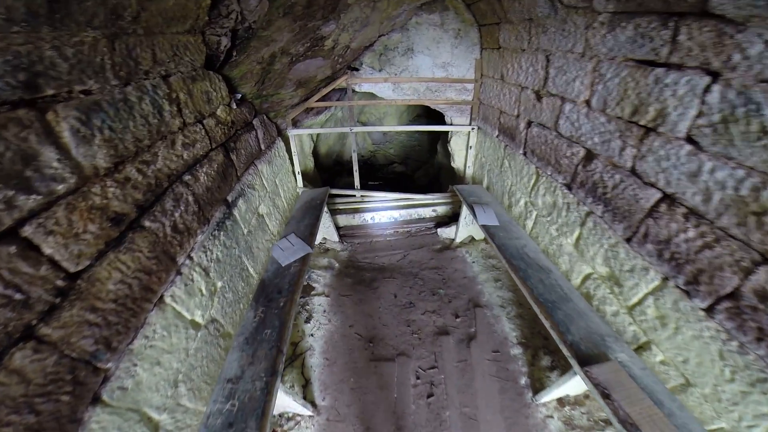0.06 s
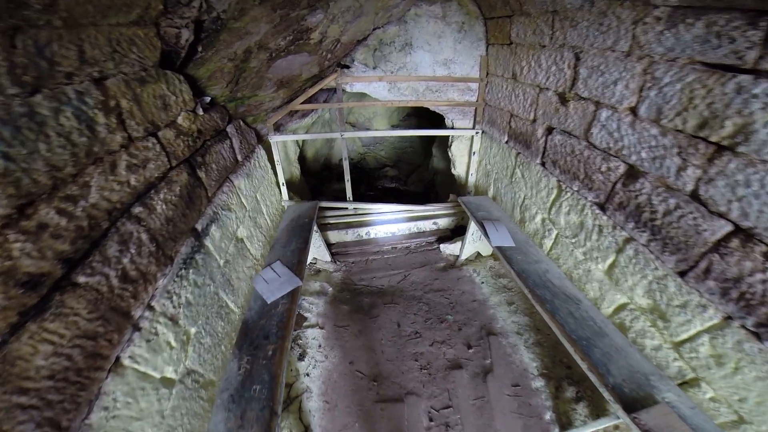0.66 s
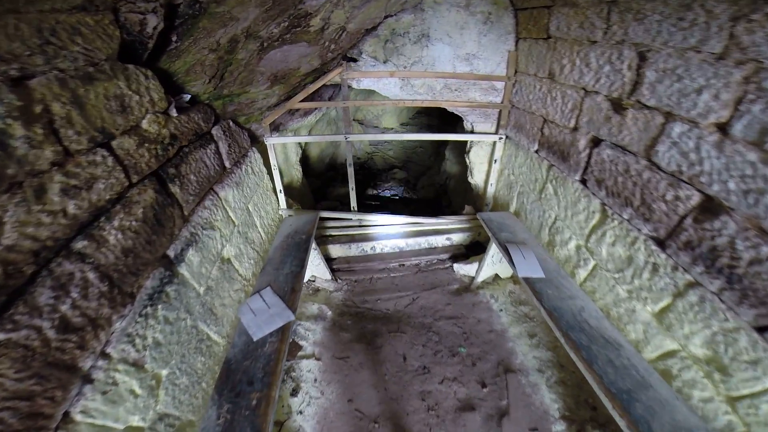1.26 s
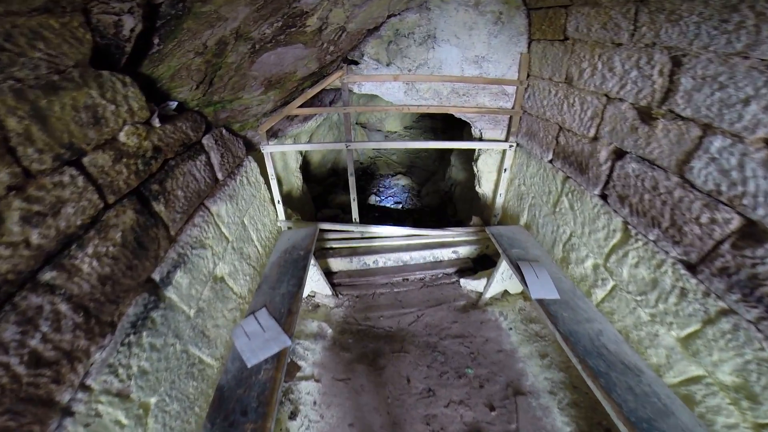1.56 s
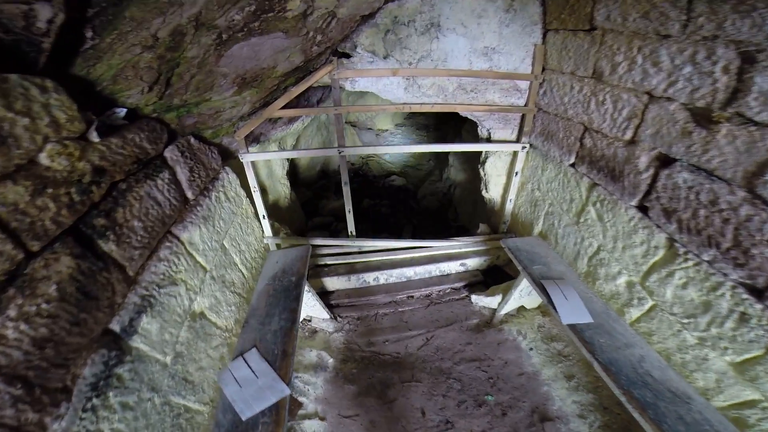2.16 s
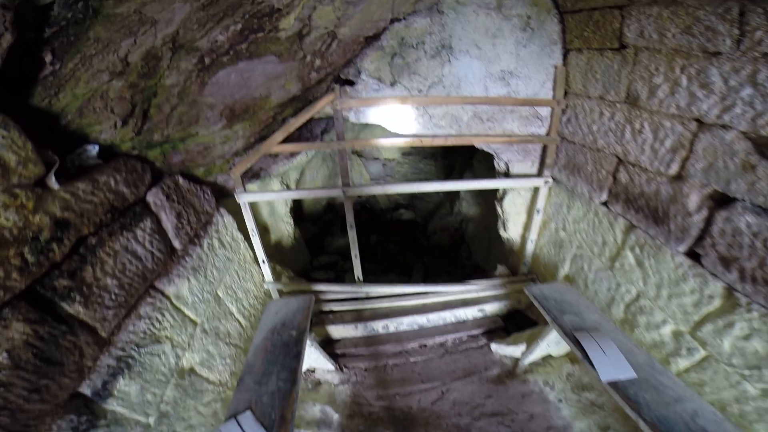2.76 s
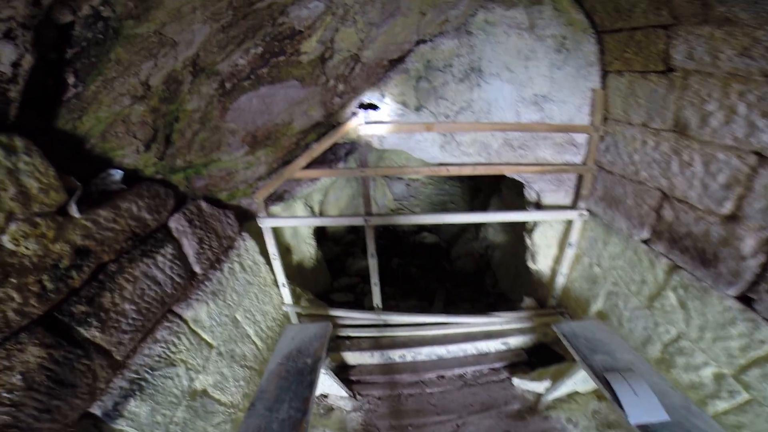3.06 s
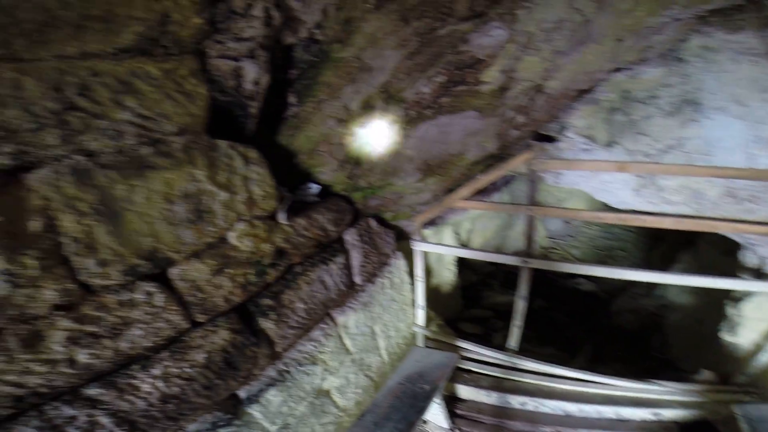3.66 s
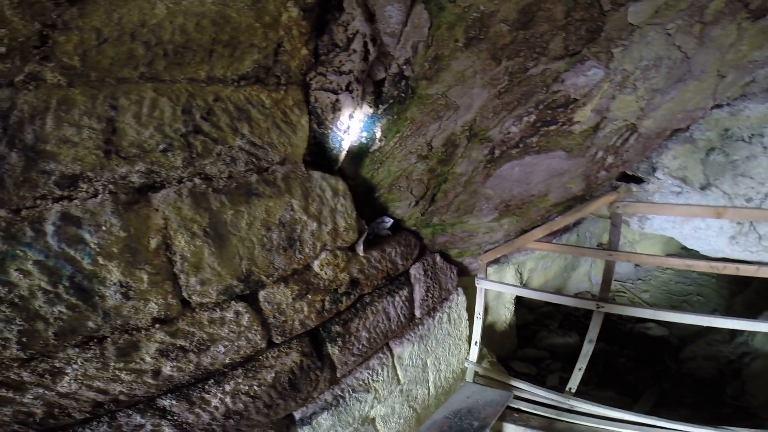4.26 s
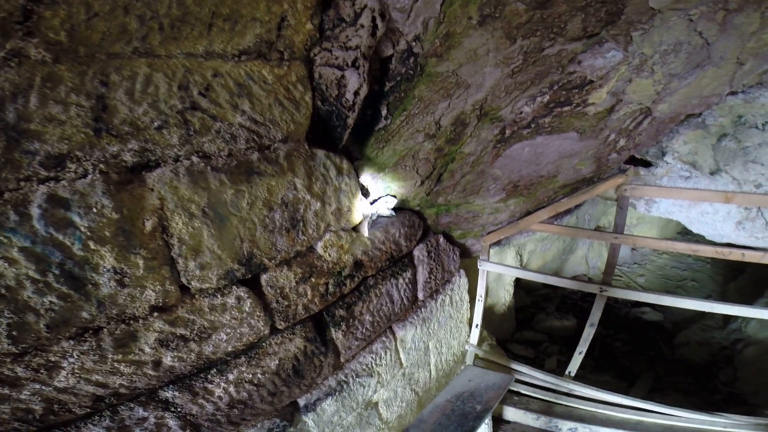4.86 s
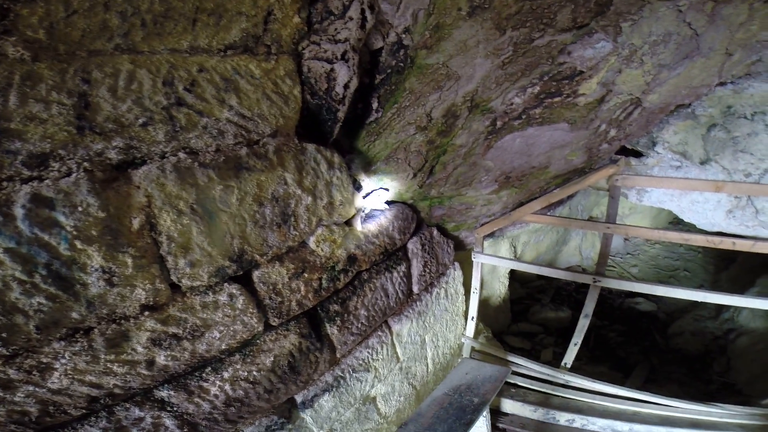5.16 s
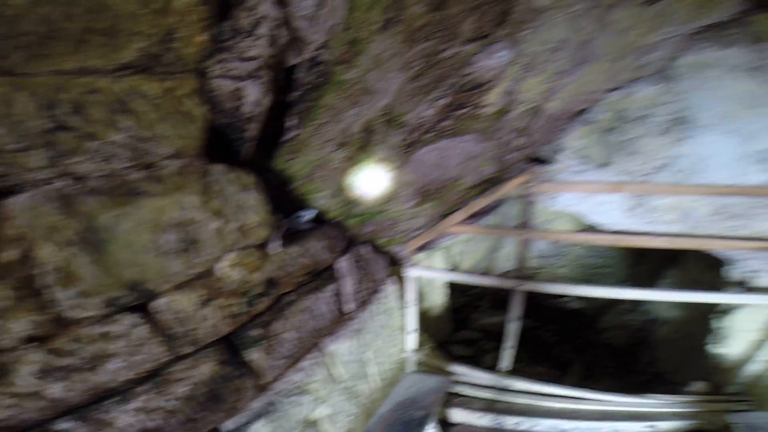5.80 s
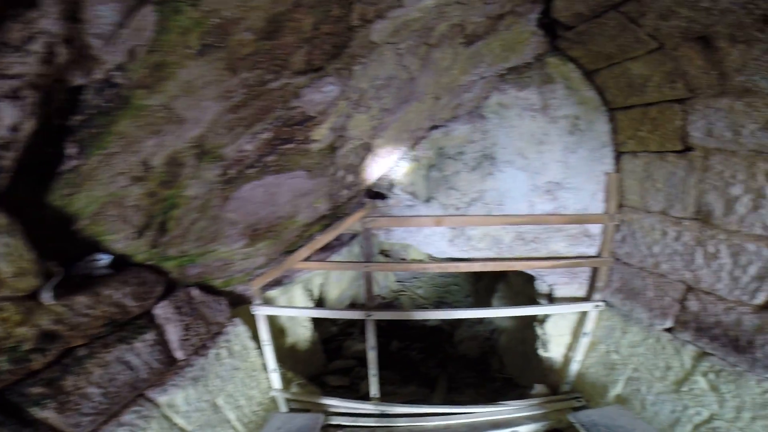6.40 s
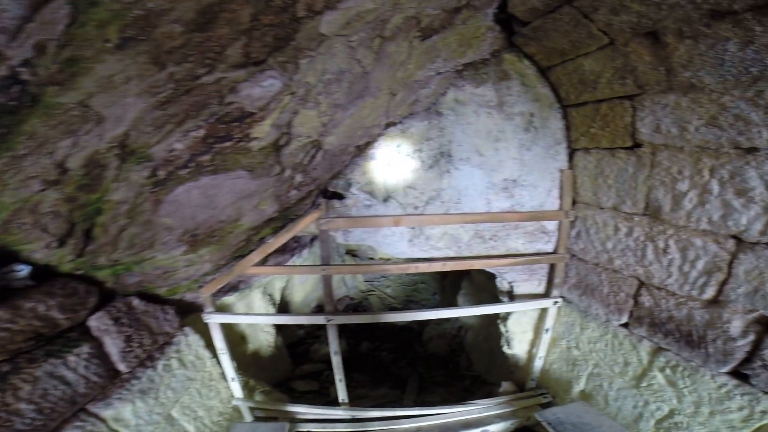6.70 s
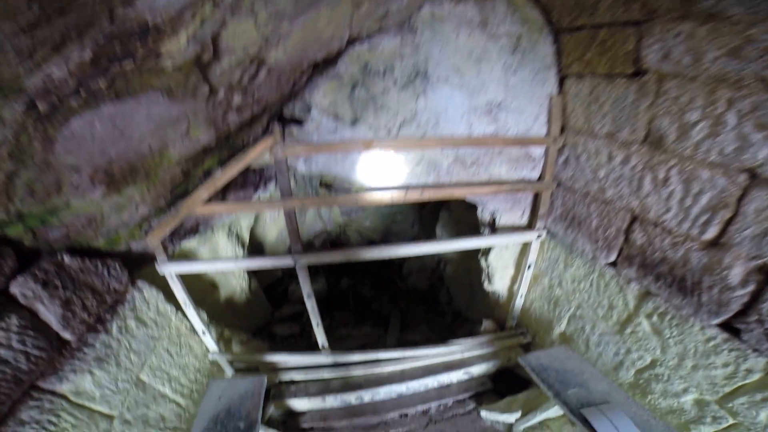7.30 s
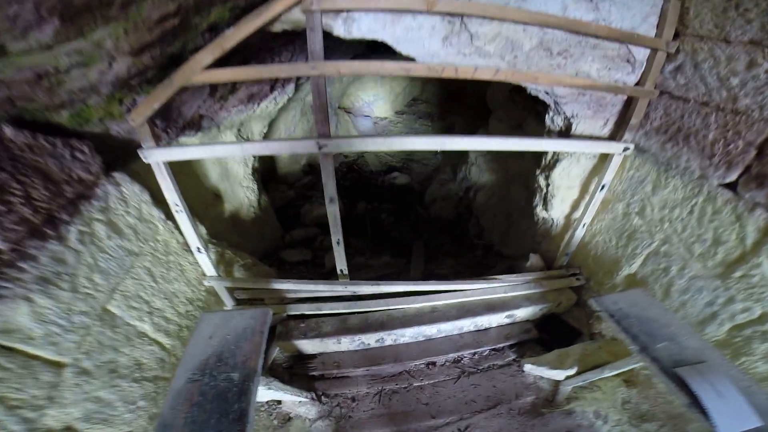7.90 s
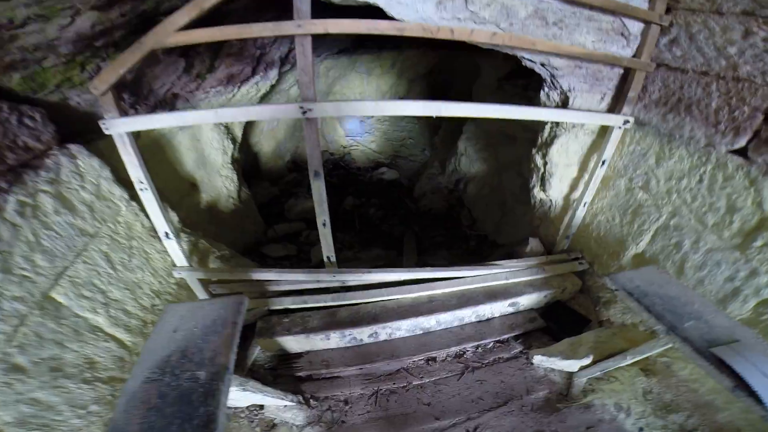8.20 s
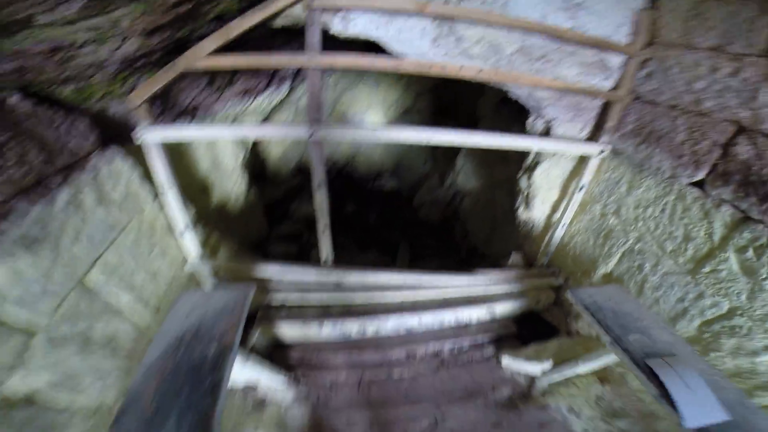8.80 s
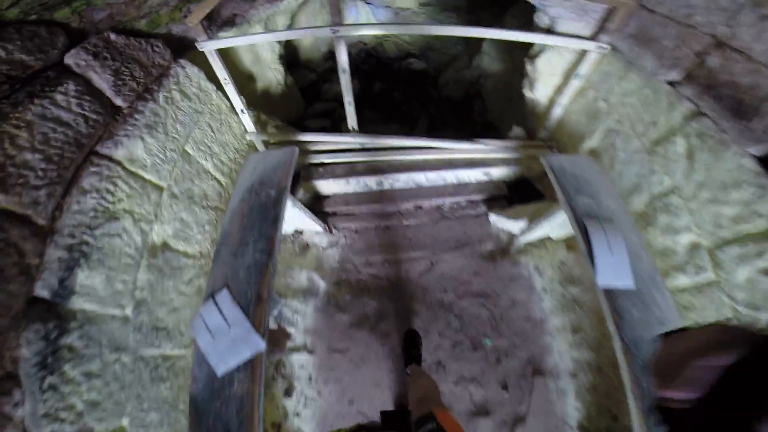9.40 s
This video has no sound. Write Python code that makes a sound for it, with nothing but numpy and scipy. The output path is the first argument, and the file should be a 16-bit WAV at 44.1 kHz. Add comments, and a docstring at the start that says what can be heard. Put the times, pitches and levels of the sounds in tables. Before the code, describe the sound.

A hand-held microphone picks up steady hiss, a barely audible high whine and low handling rumble inside a stone cave tunnel. Water drips irregularly throughout, small hollow plops and bright ticks echoing briefly off close walls, with fainter drips farther in. Fingers softly knock the case now and then. Towards the end the rumble grows and clothing rustles, finishing with a light swish.

```python
"""A quiet stone passage at the mouth of a cave, heard from a hand-held camera.
From the start a steady hiss and the thin whine of the power converter lie under a low handling rumble.
From 0.3 s on, sparse drops plop and spatter with short wall echoes, coloured hollow by the microphone.
Fingers bump the case now and then; the clearest drops fall near 3.6, 5.7 and 7.3 s.
From about 8 s the hand turns the camera: the rumble swells, and a sleeve rustles and finally swishes."""
import sys
import numpy as np
from scipy import signal
from scipy.fft import rfft, irfft, next_fast_len
from scipy.io import wavfile
from scipy.ndimage import uniform_filter1d

SR = 44100
rng = np.random.default_rng(int(sys.argv[2]) if len(sys.argv) > 2 else 0)


def master(y):
    """Save y as 16-bit WAV."""
    cut = np.clip(np.atleast_2d(y).T, -1, 1)
    pcm = np.round(cut * 32767)  # scale
    wavfile.write(sys.argv[1], SR, pcm.astype(np.int16))


N = 425565

# steady hiss: (frequency [Hz], relative spectral density [dB])
HISS_SPECTRUM = [(20, 2), (45, -13.5), (90, -9.5), (130, -11.5), (250, -14.5), (600, -19), (1150, -22.5),
                 (1620, -23.5), (2000, -25), (2550, -25.5), (3500, -28.5), (5800, -31.5), (7200, -35.5),
                 (11500, -41), (14800, -49)]
# partials of the power converter: (harmonic number [-], rms level [dB])
WHINE_HARMONICS = [(1, -84.5), (2, -79.5), (3, -76.5), (4, -84), (5, -82.5)]
# rubbing cloth: (frequency [Hz], relative spectral density [dB])
CLOTH_SPECTRUM = [(200, -0.5), (450, -0.5), (1100, -9.5), (1650, -2), (2600, -4), (3600, -13),
                  (5300, -18.5), (9000, -23), (14000, -48)]
# sleeve moving with the camera: (time [s], level [dB])
RUB_ENVELOPE = [(0, -79), (7.3, -83.5), (8.1, -68.5), (8.5, -74), (8.9, -72), (9.15, -66), (9.45, -69),
                (9.57, -65), (9.65, -67)]
# brief swish of fabric: (time [s], level [dB])
SWISH_ENVELOPE = [(0, -110), (9.3, -100), (9.5, -78), (9.57, -70), (9.65, -71)]
# how briskly the hand moves the camera: (time [s], effort level [dB])
HAND_MOTION = [(0.0, -57), (0.54, -60), (0.88, -59), (1.29, -57), (1.64, -64), (2.15, -55.5), (3.39, -59),
               (3.87, -62), (4.27, -62), (5.75, -65.5), (6.07, -69), (7.01, -67.5), (7.85, -47),
               (8.09, -47), (8.71, -49), (8.97, -36.5), (9.65, -50.5)]
# shifts of the grip: (time [s], duration [s], effort level [dB])
GRIP_SURGES = [(0.404, 0.16, -46.5), (1.196, 0.07, -58), (1.927, 0.14, -50), (2.577, 0.18, -55.5),
               (3.697, 0.093, -53), (3.993, 0.05, -52), (5.754, 0.16, -60.5), (6.563, 0.08, -60),
               (7.058, 0.18, -58), (8.817, 0.13, -42), (9.078, 0.13, -40.5), (9.251, 0.049, -34.5),
               (9.416, 0.096, -42.5)]
# vibration of the camera body: (frequency [Hz], relative spectral density [dB])
RUMBLE_SPECTRUM = [(12, -1), (20, 4), (30, 4), (40, -2), (50, -8), (65, -11), (84, -11), (105, -24.5),
                   (150, -31.5), (300, -47), (2000, -100)]
# fingers knocking softly on the case: (time [s], peak level [dB])
FINGER_BUMPS = [(0.406, -42.5), (0.512, -47), (0.702, -48), (1.27, -46), (1.92, -44.5), (1.99, -47),
                (3.779, -50), (3.905, -47.5), (4.999, -50), (9.279, -43)]
# early reflections from the near walls: (delay [s], gain [-])
WALL_ECHOES = [(0.0028, 0.5), (0.0088, 0.6), (0.0145, 0.65), (0.0168, 0.6), (0.022, 0.35)]
# bright top of some drops' spatter, and a few separate ticks: (time [s], frequency [Hz], level [dB])
HIGH_TICKS = [(0.574, 10200, -84), (2.035, 9700, -81), (2.625, 10000, -83), (2.768, 10000, -82),
              (3.690, 6160, -77), (4.095, 6160, -76), (4.170, 5900, -78), (4.746, 4200, -81),
              (5.355, 6240, -81), (5.89, 10000, -83), (6.515, 9800, -85), (7.322, 10400, -87)]
# fixed microphone resonances: (frequency [Hz], bandwidth [octaves], level relative to the plop [dB])
MICROPHONE_RESONANCES = [(1625, 0.27, -6.5), (2457, 0.18, -7)]
# drops: (time [s], plop frequency [Hz], plop level [dB], spatter frequency [Hz], spatter level [dB])
NEAR_DROPS = [(0.331, 2930, -67.5, 5100, -80), (0.565, 1860, -64.5, 5560, -75),
              (0.579, 2570, -66, 5760, -72), (0.692, 2080, -68, 5200, -84), (1.328, 1700, -70, 5700, -79),
              (2.041, 2600, -70, 5340, -72), (2.623, 1670, -75, 5420, -75), (2.767, 1880, -72, 5600, -77),
              (3.112, 2000, -74, 5600, -76), (3.559, 2380, -66.5, 5070, -73), (3.57, 1720, -62, 5190, -75),
              (4.296, 2320, -72, 4950, -73.5), (5.077, 1810, -73, 3600, -74), (5.091, 2270, -68, 3700, -72),
              (5.476, 1910, -75, 5760, -73.5), (5.652, 2300, -60, 4370, -74), (5.656, 1600, -67, 5300, -80),
              (5.945, 1630, -73, 5000, -84), (6.191, 2230, -69, 4370, -88), (6.563, 2220, -74, 5740, -70.5),
              (7.319, 2300, -59.5, 5530, -69), (7.987, 1860, -77, 4770, -67.5),
              (8.723, 1890, -68, 5200, -79), (9.048, 2110, -70, 4330, -74), (9.329, 2200, -69, 5680, -80)]


def from_db(db):
    """Amplitude ratio of a level in decibels."""
    return 10 ** (np.asarray(db) / 20)


def unit_rms(x):
    """Normalisation to an rms of 1."""
    return x / np.sqrt(np.mean(x ** 2) + 1e-20)


def envelope(rows):
    """Amplitude at every sample, by linear interpolation of (time [s], level [dB]) rows."""
    return from_db(np.interp(np.arange(N) / SR, *np.transpose(rows)))


def add(out, start_s, sound):
    """Superposition: a sound adds to the mix from its start time on."""
    at = max(0, round(start_s * SR))
    out[at:at + len(sound)] += sound[:max(0, N - at)]


def at_level(sound, db):
    """Scaling that sets the rms level of the first 55 ms."""
    head = sound[:round(.055 * SR)]
    return from_db(db) * sound / np.sqrt(np.mean(head ** 2))


def band(x, hz, octaves, order=2):
    """Band-pass filtering: the narrower the band, the longer it rings."""
    edges = np.clip(hz * 2 ** (np.array([-.5, .5]) * max(octaves, .05)), 5, .45 * SR)
    return signal.sosfilt(signal.butter(order, edges, "band", fs=SR, output="sos"), x + 1e-18)


def coloured_noise(spectrum):
    """Spectral shaping of white noise, with an rms of 1 and nothing below the first frequency."""
    hz, db = np.transpose(spectrum)
    size = next_fast_len(N)
    f = np.maximum(np.arange(size // 2 + 1) * SR / size, 1)
    gain = from_db(np.interp(np.log(f), np.log(hz), db)) * (f > hz[0])
    return unit_rms(irfft(rfft(rng.standard_normal(size)) * gain, size)[:N])


def hiss(level_db=-60):
    """Stationary noise: a constant spectrum that falls towards the treble."""
    return from_db(level_db) * coloured_noise(HISS_SPECTRUM)


def converter_whine(pitch_hz=2926.5, sag_hz=277, dip_db=-5.0, frame_hz=29.97, sag_share=0.07):
    """Periodic modulation: once per picture frame the converter's tone briefly sags in pitch and level, so each
    frame starts it in the same phase."""
    sagging = (np.arange(N) / SR * frame_hz) % 1 < sag_share
    phase = 2 * np.pi * np.cumsum(pitch_hz - sag_hz * sagging) / SR
    strength = from_db(dip_db * uniform_filter1d(sagging.astype(float), size=60))
    tone = sum(np.sqrt(2) * from_db(db) * np.sin(round(k) * phase) for k, db in WHINE_HARMONICS)
    return strength * tone


def sleeve_rustle(grain_db=2.0):
    """Friction noise: cloth slides in small uneven slips and swishes when it moves fast."""
    slips = unit_rms(uniform_filter1d(rng.standard_normal(N), size=300))
    rub = envelope(RUB_ENVELOPE) * coloured_noise(CLOTH_SPECTRUM)
    swish = envelope(SWISH_ENVELOPE) * unit_rms(band(rng.standard_normal(N), hz=5300, octaves=0.93))
    return (rub + swish) * unit_rms(from_db(grain_db * slips))


def hand_effort(attack_s=0.033, release_s=0.048):
    """Addition of powers: steady motion and a surge at each shift of the grip give one amplitude."""
    t = np.arange(N) / SR
    power = envelope(HAND_MOTION) ** 2
    for start_s, length_s, db in GRIP_SURGES:
        attack = np.clip((t - start_s) / attack_s, 0, 1)
        release = np.exp(-np.maximum(t - start_s - length_s, 0) / release_s)
        power += (from_db(db) * attack * release) ** 2
    return np.sqrt(power)


def handling(rumble_db=-61.5, calm_db=-59, shake_slope=0.84, sway_db=5.0, bump_hz=55, uneven_db=2.0):
    """Structure-borne sound: the hand shakes, sways and now and then bumps the camera body."""
    unsteady = unit_rms(band(rng.standard_normal(N), hz=6.35, octaves=0.97))
    effort_db = 20 * np.log10(hand_effort()) + uneven_db * unsteady
    shake = coloured_noise(RUMBLE_SPECTRUM)
    even_shake = shake / np.sqrt(uniform_filter1d(shake ** 2, size=4000) + 1e-6)
    # about a calm hold, the rumble changes less than in step with the effort
    rumble = from_db(rumble_db + shake_slope * (effort_db - calm_db)) * even_shake
    tremor = band(rng.standard_normal(N), hz=12, octaves=0.36, order=3)
    even_tremor = np.cos(np.angle(signal.hilbert(tremor)))
    sway = from_db(effort_db + sway_db) * unit_rms(band(even_tremor, hz=11.58, octaves=0.92))
    thud = band(signal.unit_impulse(SR // 4), bump_hz, octaves=1.47, order=3)
    out = rumble + sway
    for start_s, db in FINGER_BUMPS:
        add(out, start_s, from_db(db) * thud / np.abs(thud).max())
    return out


def passage_response(t60_s, diffuse_db):
    """Impulse response: the direct path, near-wall reflections, then scatter from rough stone."""
    t = np.arange(SR // 2) / SR
    build_up = 1 - np.exp(-t / 0.0023)
    scatter = rng.standard_normal(len(t)) * from_db(-60 * t / t60_s) * build_up
    paths = from_db(diffuse_db) * scatter / np.linalg.norm(scatter)
    paths[0] += 1
    for delay_s, gain in WALL_ECHOES:
        # each drop lands elsewhere, so its echo paths differ a little
        add(paths, delay_s * rng.uniform(.92, 1.08), np.array([gain]))
    return paths


def far_drips(count=30):
    """Random arrivals: drops deeper in the cave barely top the hiss; the higher ones are fainter."""
    out = np.zeros(N)
    for when, pitch, size in rng.random((count, 3)):
        drop = band(passage_response(t60_s=0.3, diffuse_db=6.0), hz=1600 * 4 ** pitch, octaves=0.5)
        level_db = -76 - 5 * pitch + 3 * size
        add(out, when * N / SR, at_level(drop, level_db))
    return out


def high_ticks():
    """Narrow resonance: the bright top of some drops' spatter, plus a few faint separate ticks."""
    out = np.zeros(N)
    for start_s, hz, db in HIGH_TICKS:
        tick = band(passage_response(t60_s=0.17, diffuse_db=0.0), hz, octaves=0.15, order=3)
        add(out, start_s, at_level(tick, db))
    return out


def near_drips(plop_octaves=0.16, blur_octaves_per_db=0.09, crack_db=-3.0):
    """Damped resonance: each impact excites a plop, a briefer, brighter spatter and a faint crack."""
    out = np.zeros(N)
    for start_s, plop_hz, plop_db, spatter_hz, spatter_db in NEAR_DROPS:
        # fainter drops are farther off: more scatter from the walls and a more blurred pitch
        far_db = 0.5 * (-54 - plop_db)
        plop_paths = passage_response(t60_s=0.32, diffuse_db=4 + far_db)
        spatter_paths = passage_response(t60_s=0.21, diffuse_db=12.0)
        plop = band(plop_paths, plop_hz, plop_octaves + blur_octaves_per_db * far_db, order=3)
        add(out, start_s, at_level(plop, plop_db))
        # the microphone gives every near drop a hollow colour
        for hz, octaves, db in MICROPHONE_RESONANCES:
            colour = band(passage_response(t60_s=0.31, diffuse_db=10.0), hz, octaves, order=3)
            add(out, start_s, at_level(colour, plop_db + db))
        spatter = band(spatter_paths, spatter_hz, octaves=0.48, order=3)
        add(out, start_s, at_level(spatter, spatter_db))
        crack = band(spatter_paths, hz=4600, octaves=1.8)
        add(out, start_s, at_level(crack, spatter_db + crack_db))
    return out


def scene():
    """Superposition of the water, the hiss and the camera's own sounds in one channel."""
    water = near_drips() + high_ticks() + far_drips()
    background = hiss() + converter_whine() + handling() + sleeve_rustle()
    return (water + background)[None]


def record(dry, cutoff_hz=15000):
    """Low-pass filtering: an elliptic filter cuts the top of the treble steeply."""
    return signal.sosfilt(signal.ellip(12, .1, 70, cutoff_hz, fs=SR, output="sos"), dry)


dry = scene()
out = record(dry)
master(out)
```